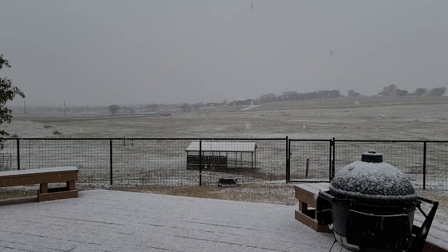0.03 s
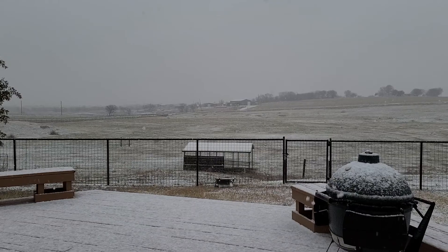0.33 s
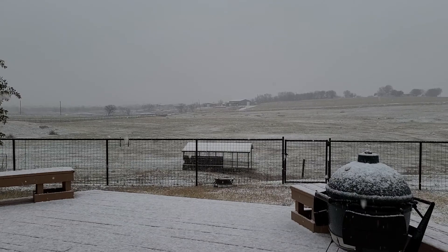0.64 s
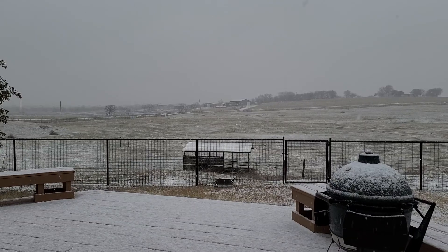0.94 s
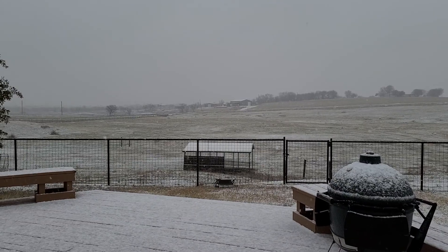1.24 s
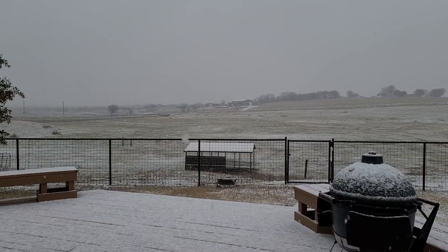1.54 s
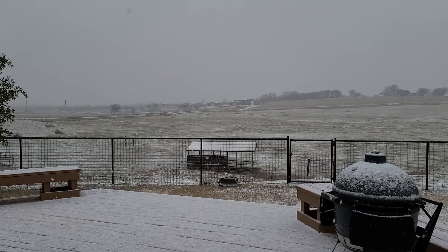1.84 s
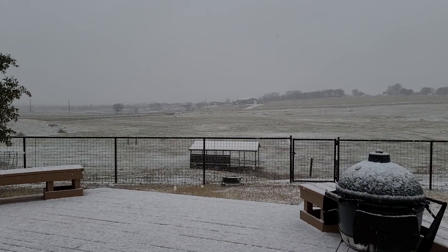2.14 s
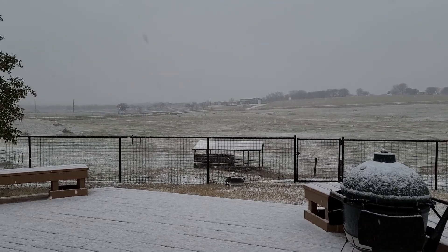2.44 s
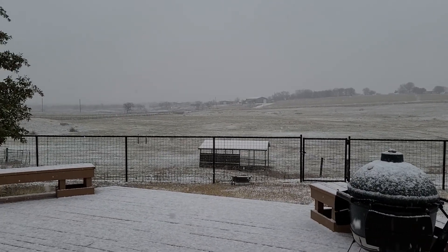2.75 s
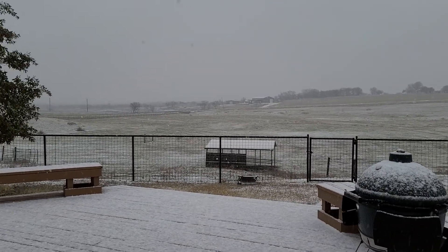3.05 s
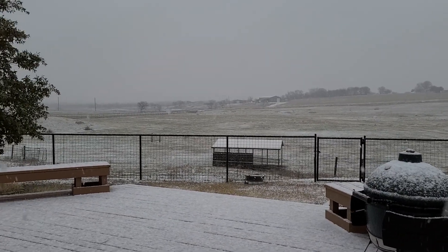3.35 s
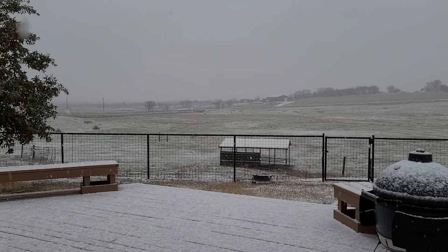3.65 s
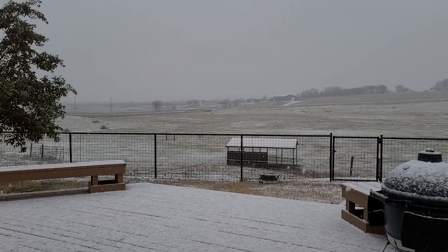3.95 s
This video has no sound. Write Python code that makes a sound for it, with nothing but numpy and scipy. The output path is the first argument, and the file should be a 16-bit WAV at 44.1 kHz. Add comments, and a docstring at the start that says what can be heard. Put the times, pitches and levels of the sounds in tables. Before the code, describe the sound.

Fine sleet patters outdoors in a steady, bright hiss for about four seconds, with faint taps on a wooden deck and a light rattle on leaves. A few grains tick close by, one sharply at about 0.8 seconds. A light breeze rumbles softly on the microphone, shifting between left and right, then picks up after 3 seconds, with stronger puffs around 3.4 and 3.9 seconds.

```python
"""Fine sleet on a snowy wooden deck and the field beyond, from a hand-held stereo microphone.
After a moment's silence, countless tiny grains merge into a bright hiss, and a light breeze buffets
the two microphone ports in turn. Pellets tap the boards and rattle stiff leaves throughout.
A few grains tick close by, one sharply within the first second. Near the end the breeze picks up."""
import sys
import numpy as np
from scipy import signal
from scipy.fft import rfft, irfft
from scipy.io import wavfile

SR = 44100
rng = np.random.default_rng(int(sys.argv[2]) if len(sys.argv) > 2 else 0)


def materialize(psi):
    """Save the field psi as 16-bit PCM at rate SR to the path in sys.argv[1].

    A 1-D psi becomes a single channel; in a 2-D psi each row is a channel.
    """
    bounded = np.clip(np.atleast_2d(psi).T, -1, 1)
    quanta = np.round(bounded * 32767).astype(np.int16)
    wavfile.write(sys.argv[1], SR, quanta)


N = 176400

# colour of the patter at each port: f/Hz, left relative level/dB, right relative level/dB
PATTER_COLOUR = [(150, -5.5, -7), (302, -7.5, -6.5), (493, -11.5, -10.5), (730, -8.5, -6), (960, -14, -13),
                 (1340, -9, -4.5), (1900, -6, -2), (2420, -10.5, -14.5), (2960, -4, -7.5), (3860, -5, -2),
                 (5200, -3.5, -10), (6350, -6.5, -2), (7760, -14, -7), (9100, -4.5, -3), (10470, -8, -2.5),
                 (11700, -2, -1), (13000, -2, -1), (14900, 2, 3), (15800, -1, -1.5)]
# how thickly the sleet falls, a gain on hiss, grains and leaves: t/s, level/dB
SLEET_FALL = [(.1, -1.5), (.7, -1), (1.3, 0.5), (2.1, 1), (2.8, 0), (3.4, 0.56), (4, 0.5)]
# likeness of the hiss at the two ports: f/Hz, correlation (-1..1)
PORT_LIKENESS = [(100, 1), (200, 1), (380, 1), (700, 0.59), (1290, -0.39), (2400, 0.13), (15000, -0.056)]
# grains landing close to the microphone: t/s, level/dB, left minus right/dB
CLOSE_TICKS = [(0.435, -37, 7), (.4885, -38, 0), (0.535, -37, 4), (0.636, -34, -6), (0.7561, -18, 1),
               (1.067, -31, 4), (1.374, -33, -3), (1.5690, -35, 6), (1.739, -36, 3), (3.2388, -33, 1),
               (3.245, -35, 16), (3.708, -36, 4)]
# colour of a tick: f/Hz, relative level/dB
TICK_COLOUR = [(300, -31), (1000, -25), (1700, -11), (2300, -16), (4500, -16), (7000, -14), (8300, -14),
               (10500, -15), (12300, -6.5), (15000, -5.5)]
# a tick's first strike, then its rebounds and echoes: delay/s, relative level/dB
TICK_REBOUNDS = [(0, 0), (.0015, -13), (.0046, -22), (.0099, -18)]
# heavier pellets on the deck: t/s, level/dB, left minus right/dB
DECK_TAPS = [(0.261, -62, -3), (0.584, -63, -8), (1.066, -53, -2), (1.237, -56, -1), (1.375, -63, -6),
             (1.645, -53, -1), (1.797, -57, -6), (2.303, -45, -1.5), (2.626, -50, -1), (2.996, -55, -2),
             (3.111, -54, -4), (3.24, -62, -3), (3.467, -55, -4), (3.571, -55, 1)]
# colour of a tap on the boards: f/Hz, relative level/dB
BOARD_COLOUR = [(200, -13), (450, -4.5), (1000, -8), (1750, 0), (2350, -7), (3200, -2.5), (5500, -6),
                (9000, -9.5), (15000, -26)]
# puffs of wind on the microphone: t/s, length/s, level/dB, port (left or right)
PUFFS = [(0.195, 0.18, -44, "left"), (0.468, 0.027, -38.5, "left"), (0.543, 0.097, -42.5, "left"),
         (0.704, 0.02, -38.5, "left"), (0.76, 0.13, -45, "left"), (0.951, 0.13, -43, "right"),
         (1.236, 0.064, -42.5, "right"), (1.64, .16, -38.5, "right"), (1.86, 0.25, -46.5, "left"),
         (1.887, 0.095, -43.5, "right"), (2.019, 0.035, -37.5, "right"), (2.538, 0.11, -37, "left"),
         (2.661, 0.031, -43.5, "left"), (2.96, .13, -46, "right"), (3.161, 0.036, -24.5, "right"),
         (3.208, 0.085, -40, "right"), (3.327, 0.081, -29.5, "right"), (3.387, 0.045, -17.5, "right"),
         (3.444, 0.042, -28.5, "right"), (3.497, 0.043, -38.5, "left"), (3.528, 0.33, -42.5, "right"),
         (3.753, 0.039, -26, "left"), (3.758, 0.21, -28, "right"), (3.865, 0.12, -31, "left"),
         (3.906, 0.013, -17.5, "right")]
# colour of gentle buffeting: f/Hz, relative level/dB
SOFT_PUFF_COLOUR = [(10, -30), (25, -2.5), (42, 6), (75, 2.5), (112, -12), (145, -21), (200, -42.5),
                    (300, -42), (600, -72), (2000, -92)]
# a hard puff sheds smaller, faster eddies: f/Hz, relative level/dB
HARD_PUFF_COLOUR = [(10, -28), (25, -14), (42, -3), (78, 7), (120, -1.5), (165, -4.5), (210, -19),
                    (300, -39), (600, -66), (2000, -97)]


def hiss(level_db=-44.5):
    """Grains far out on the field merge into a smooth wash, alike at both ports in the bass."""
    common, separate = rfft(rng.standard_normal((2, N)))
    likeness = np.clip(at_hz(PORT_LIKENESS, np.fft.rfftfreq(N, 1 / SR)), -1, 1)
    right = likeness * common + np.sqrt(1 - likeness ** 2) * separate
    return amp(level_db) * unit(ports(irfft([common, right], N)))


def grains(spots=24, per_s=2200, decay_s=0.00034, side_db=4, level_db=-49):
    """Nearer grains patter from spots left to right, each spot with its own tiny crunch."""
    out, t = np.zeros((2, N)), np.arange(256) / SR
    for side in np.linspace(-1, 1, spots):
        crunch = rng.standard_normal((2, len(t))) * np.exp(-t / decay_s) * pan(side * side_db)
        out += strike(landings(per_s / spots, spread_db=3, largest=4.55), unit(crunch))
    return amp(level_db) * unit(ports(out))


def ticks():
    """Grains right by the microphone strike with a bright tick and rebound."""
    out = np.zeros((2, N))
    for s, db, pan_db in CLOSE_TICKS:
        for delay, rebound_db in TICK_REBOUNDS:
            tick = impact(TICK_COLOUR, rise_s=.00022, decay_s=.0006)
            add(out, s + delay, tick * amp(db + rebound_db) * pan(pan_db))
    return out


def taps(spots=6, faint_per_s=45, faint_db=-60, rise_s=0.00034):
    """Pellets knock dully on the deck boards: many faint, some distinct."""
    out = np.zeros((2, N))
    for _ in range(spots):
        hits = landings(faint_per_s / spots, spread_db=1, largest=7.3)
        out += strike(hits, impact(BOARD_COLOUR, rise_s, decay_s=0.0037))
    out = amp(faint_db) * unit(out)
    for s, db, pan_db in DECK_TAPS:
        add(out, s, impact(BOARD_COLOUR, rise_s, decay_s=0.012) * amp(db) * pan(pan_db))
    return out


def breeze(rise_s=0.0146, fall_s=0.027, calm_db=-50.5, hard_db=-16, steady_s=0.038):
    """Low turbulence on the microphone, separate at each port, swells and rises in pitch with each puff."""
    t, power = np.arange(N) / SR, np.full((2, N), amp(calm_db) ** 2)
    for s, length, db, port in PUFFS:
        onset = np.clip((t - s) / rise_s + .5, 0, 1)
        tail = np.exp(-np.maximum(t - s - length, 0) / fall_s)
        power[int(port == "right")] += (amp(db) * onset * tail) ** 2
    air, hz = rfft(rng.standard_normal((2, N))), np.fft.rfftfreq(N, 1 / SR)
    soft = unit(irfft(air * amp(at_hz(SOFT_PUFF_COLOUR, hz)), N))
    hard = unit(irfft(air * amp(at_hz(HARD_PUFF_COLOUR, hz)), N))
    hardness = power / (power + amp(hard_db) ** 2)
    eddies = soft + (hard - soft) * hardness
    # even out the eddies so that the puffs set the level
    window = np.hanning(int(2 * steady_s * SR))[None]
    eddy_power = signal.fftconvolve(eddies ** 2, window / window.sum(), "same", axes=1)
    return eddies * np.sqrt(power / eddy_power)


def leaves(count=16, low_hz=3120, high_hz=6900, width_hz=1560, decay_s=0.0039, per_s=110, level_db=-58.5):
    """Grains rattle on the tree beside the deck; each stiff leaf rings briefly at its own pitch."""
    out, t = np.zeros((2, N)), np.arange(1024) / SR
    for hz in np.geomspace(low_hz, high_hz, count):
        pole = np.exp((2j * hz - width_hz) * np.pi / SR)
        burst = rng.standard_normal((2, len(t))) * np.exp(-t / decay_s)
        ring = signal.lfilter([1], [1, -pole], burst).real
        out += strike(landings(per_s / count, spread_db=5.5, largest=2.5), unit(ring))
    return amp(level_db) * unit(ports(out))


def landings(per_s, spread_db, largest):
    """Random impulses, mostly small, the biggest raised by largest * spread_db."""
    signed_hits = (rng.random(N) < per_s / SR) * rng.choice([-1, 1], N)
    return signed_hits * amp(spread_db * np.minimum(rng.exponential(1, N), largest))


def strike(hits, sound):
    """Sets off a stereo sound at every landing."""
    return signal.oaconvolve(hits[None], sound, axes=1)[:, :N]


def impact(spectrum, rise_s, decay_s, size=2048):
    """A short crunch in each channel, with rms about 1 over its main decay."""
    t = np.arange(size) / SR
    envelope = (1 - np.exp(-t / rise_s)) ** 2 * np.exp(-t / decay_s)
    bursts = rng.choice([-1., 1.], (2, size)) * envelope
    return np.array([unit(colour(burst, spectrum)) for burst in bursts]) * np.sqrt(2 * decay_s * SR / size)


def ports(x):
    """Gives each channel the colour of the patter at its microphone port."""
    return np.array([colour(x[0], PATTER_COLOUR, column=1), colour(x[1], PATTER_COLOUR, column=2)])


def colour(x, spectrum, column=1, size=4096):
    """Causal filter of unit energy with the given spectrum."""
    log_gain = np.log(amp(at_hz(spectrum, abs(np.fft.fftfreq(size, 1 / SR)), column)))
    minimum_phase = np.exp(np.conj(signal.hilbert(log_gain)))
    response = np.fft.ifft(minimum_phase).real[:size // 2]
    return signal.fftconvolve(x, response / np.linalg.norm(response))[:len(x)]


def at_hz(table, hz, column=1):
    """Reads a column of a table on a log-frequency axis."""
    columns = np.transpose(table)
    return np.interp(np.log(hz + 1), np.log(columns[0]), columns[column])


def add(mix, s, sound):
    """Mixes a stereo sound in at time s."""
    part = mix[:, round(s * SR):][:, :sound.shape[1]]
    part += sound[:, :part.shape[1]]


def pan(db):
    """Left and right gains, db apart."""
    return amp(db * np.array([[.5], [-.5]]))


def amp(db):
    """Decibels to gain."""
    return 10 ** (np.asarray(db) / 20)


def unit(x):
    """Scales to rms 1."""
    return x / np.sqrt(np.mean(x ** 2) + 1e-20)


def scene():
    """Sleet near and far, heard from the deck, with the breeze on the microphone."""
    fall = amp(np.interp(np.arange(N) / SR, *np.transpose(SLEET_FALL)))
    return fall * (hiss() + grains() + leaves()) + ticks() + taps() + breeze()


def record(dry, start_s=.1055, edge_hz=15850):
    """The microphone is silent until start_s; the top treble is cut off steeply."""
    live = dry * (np.arange(N) / SR >= start_s)
    lowpass = signal.firwin(511, edge_hz, window=("kaiser", 9), fs=SR)
    return signal.oaconvolve(live, lowpass[None], "same")


dry = scene()
out = record(dry)
materialize(out)
```